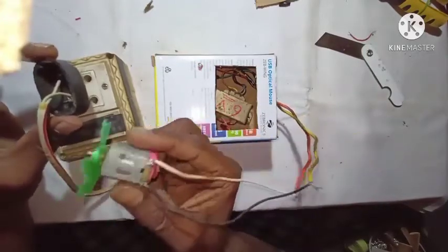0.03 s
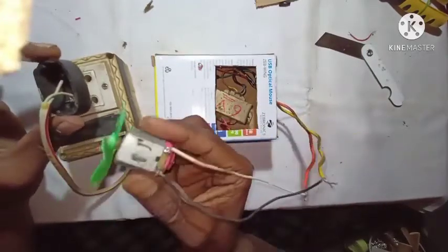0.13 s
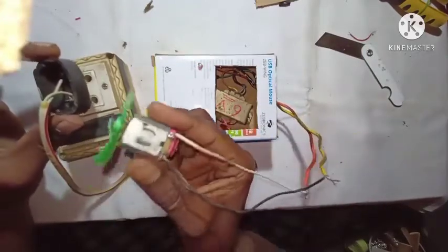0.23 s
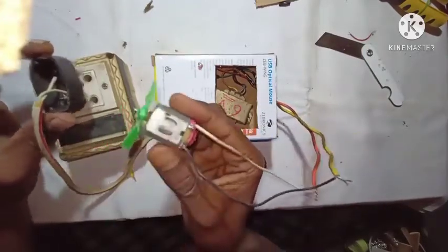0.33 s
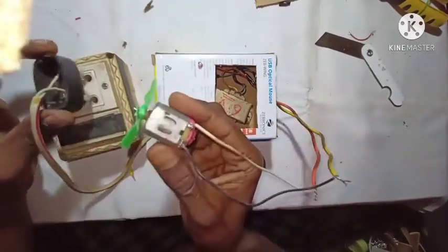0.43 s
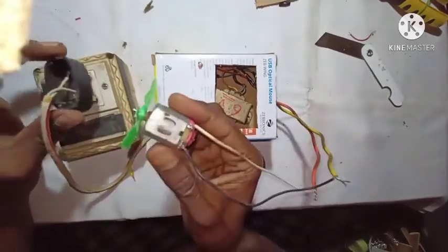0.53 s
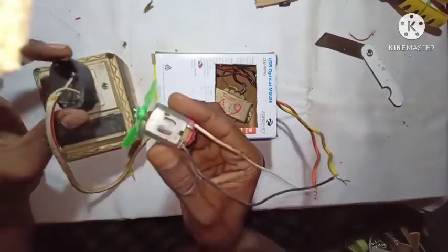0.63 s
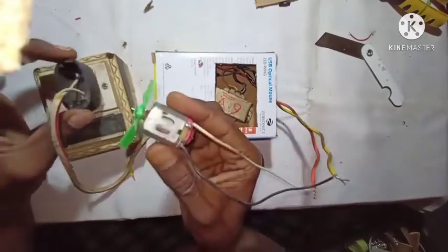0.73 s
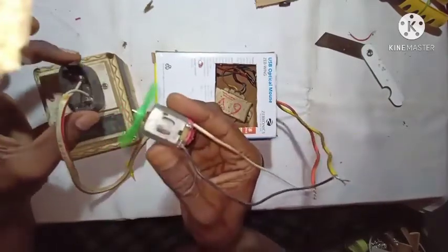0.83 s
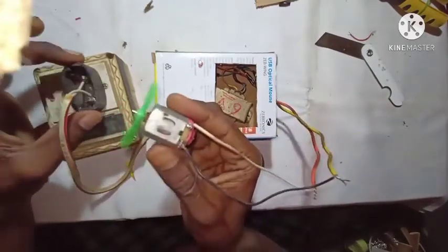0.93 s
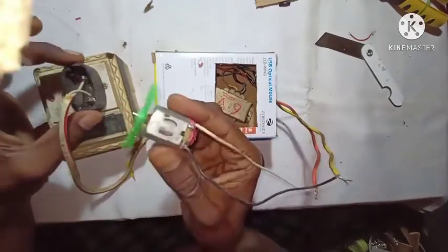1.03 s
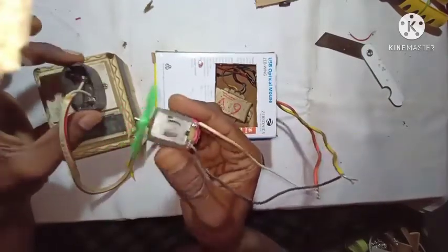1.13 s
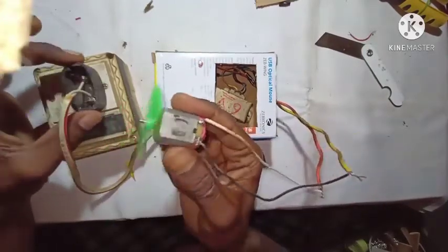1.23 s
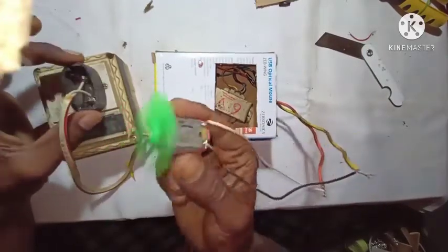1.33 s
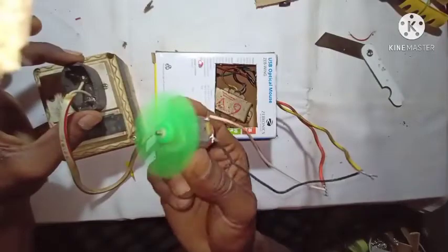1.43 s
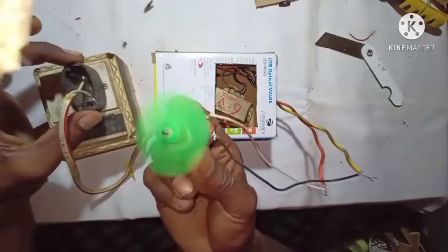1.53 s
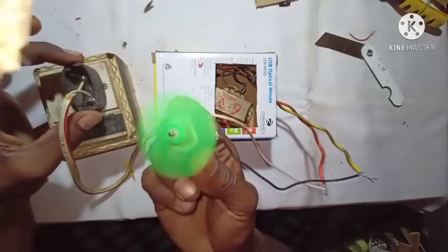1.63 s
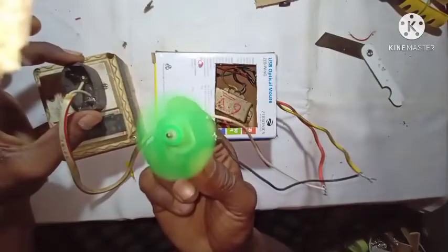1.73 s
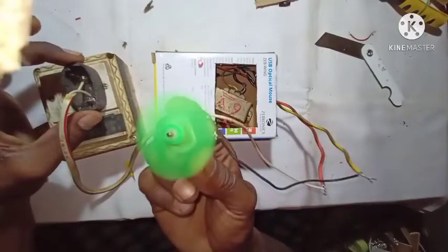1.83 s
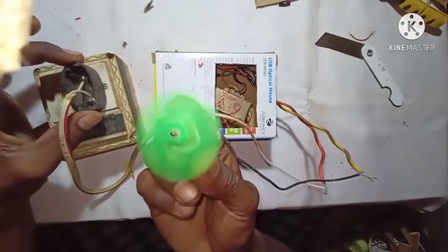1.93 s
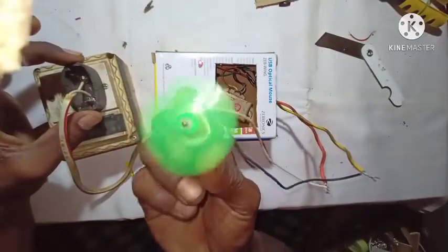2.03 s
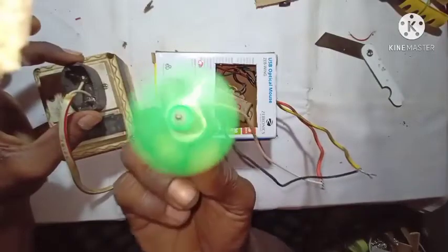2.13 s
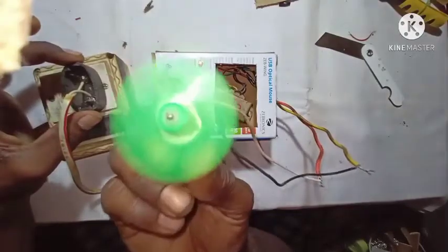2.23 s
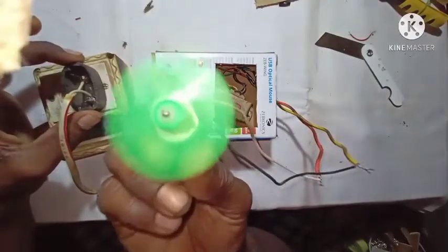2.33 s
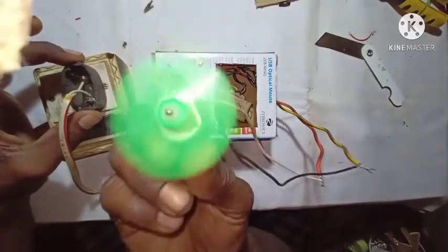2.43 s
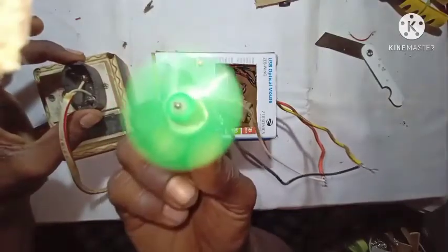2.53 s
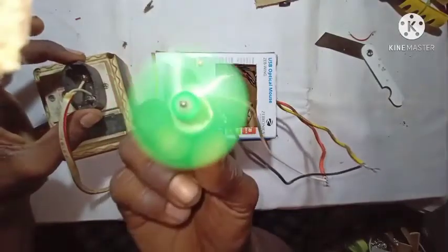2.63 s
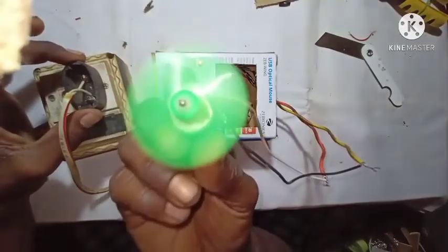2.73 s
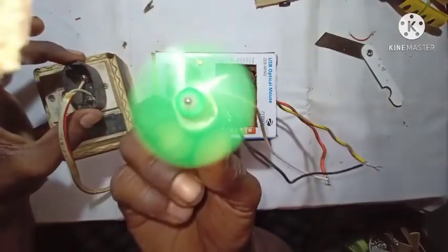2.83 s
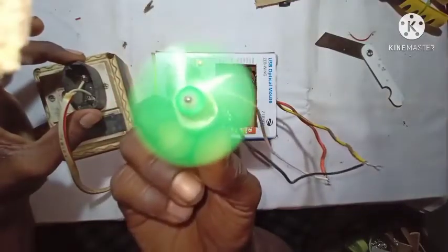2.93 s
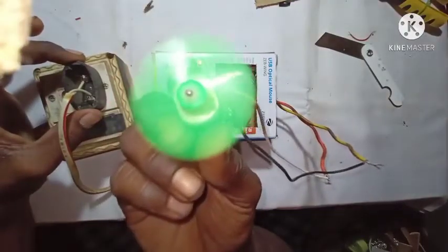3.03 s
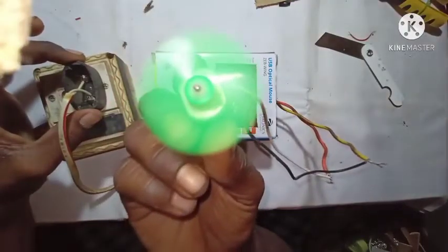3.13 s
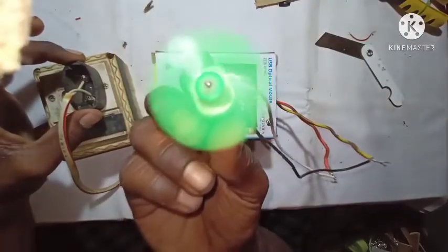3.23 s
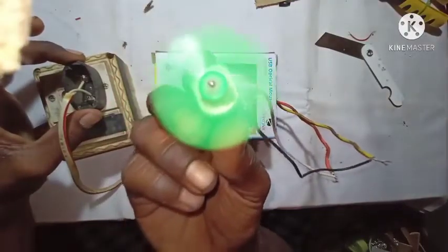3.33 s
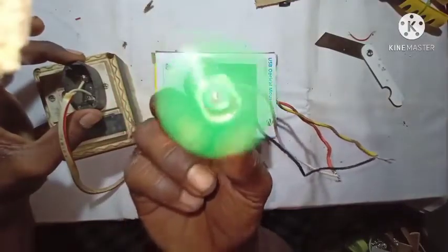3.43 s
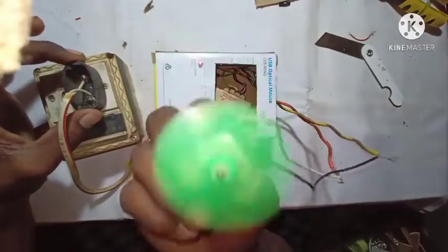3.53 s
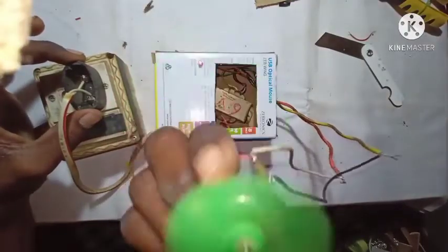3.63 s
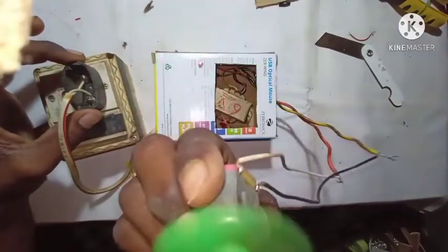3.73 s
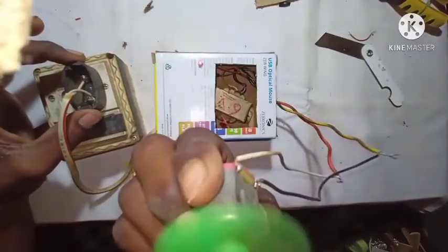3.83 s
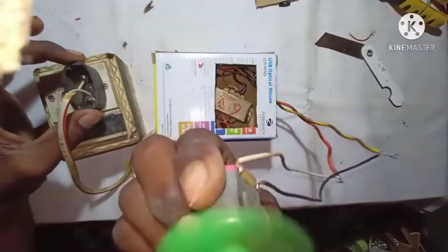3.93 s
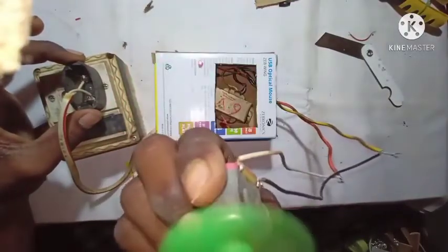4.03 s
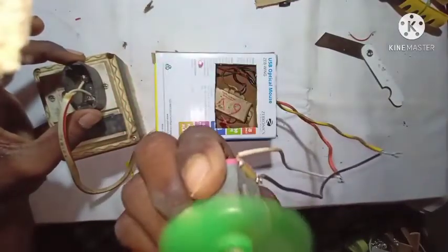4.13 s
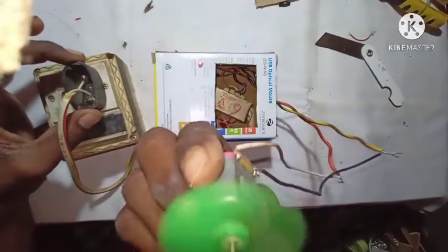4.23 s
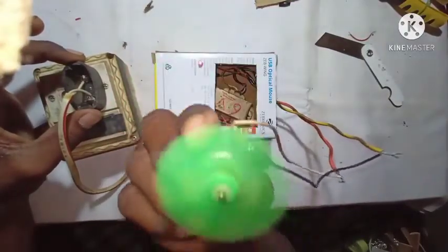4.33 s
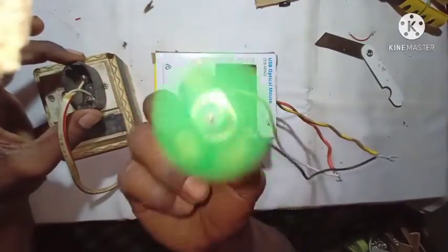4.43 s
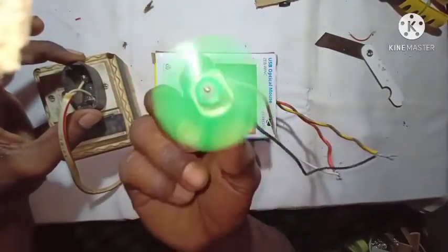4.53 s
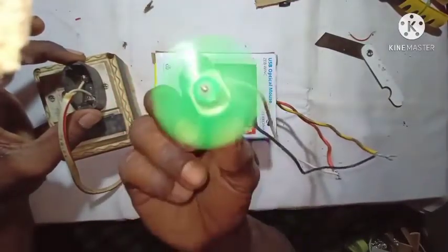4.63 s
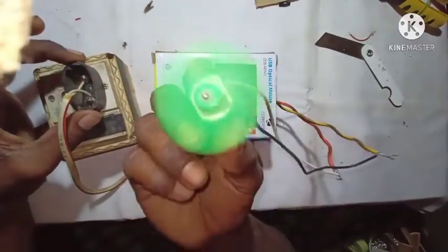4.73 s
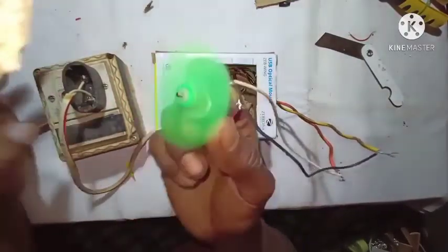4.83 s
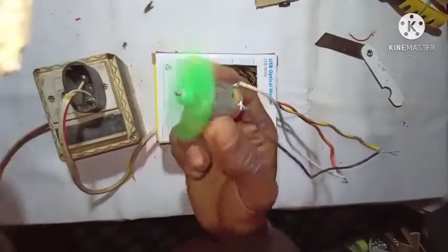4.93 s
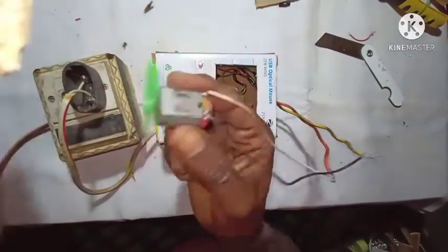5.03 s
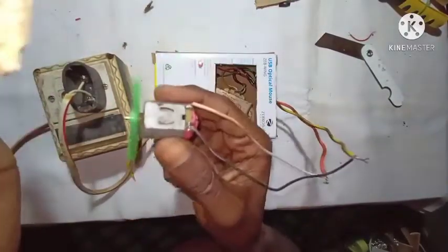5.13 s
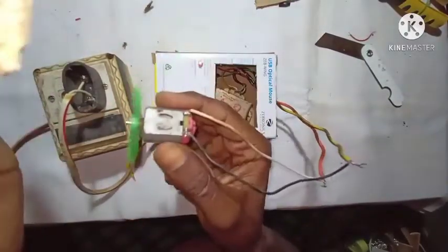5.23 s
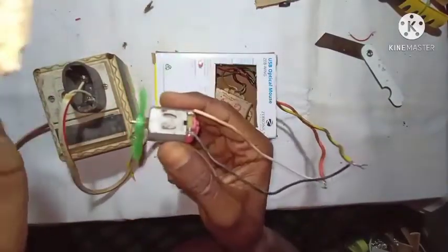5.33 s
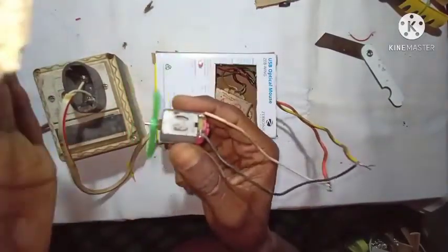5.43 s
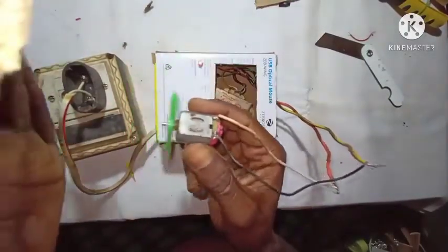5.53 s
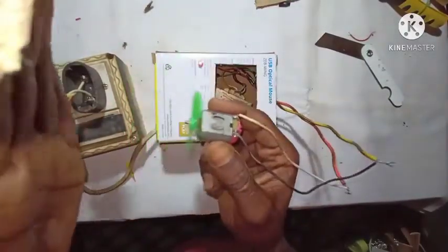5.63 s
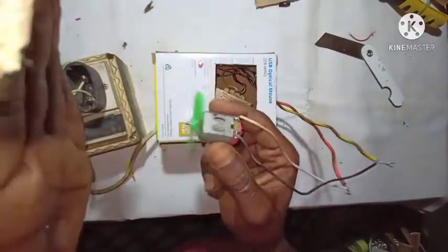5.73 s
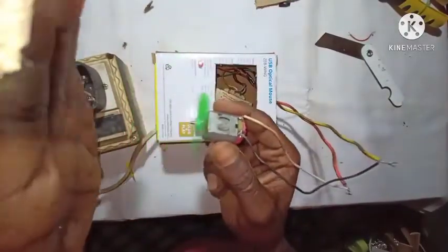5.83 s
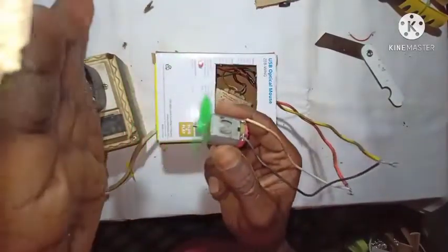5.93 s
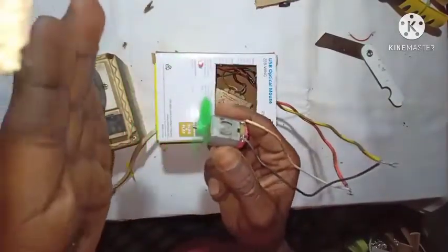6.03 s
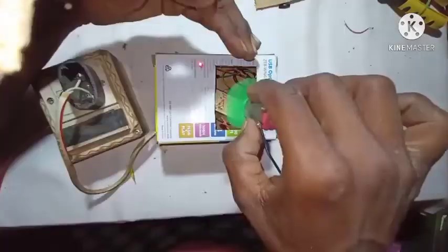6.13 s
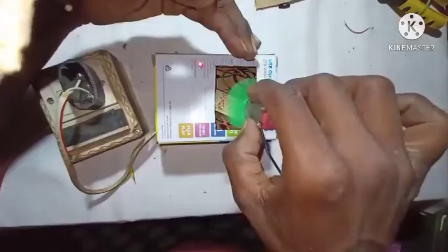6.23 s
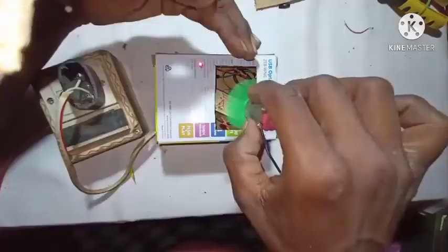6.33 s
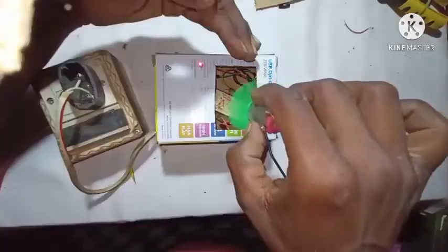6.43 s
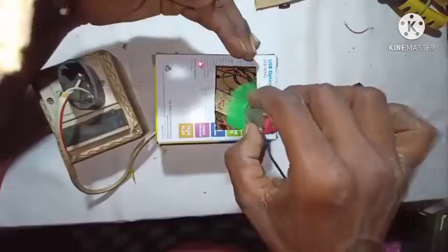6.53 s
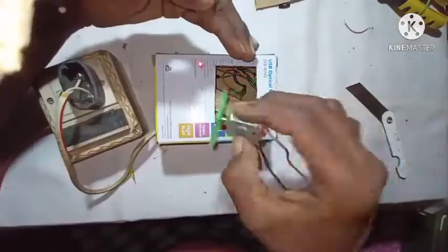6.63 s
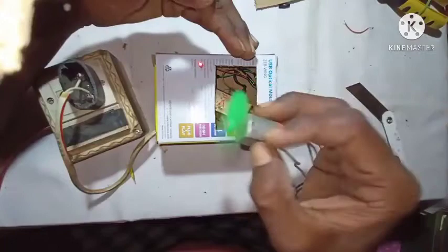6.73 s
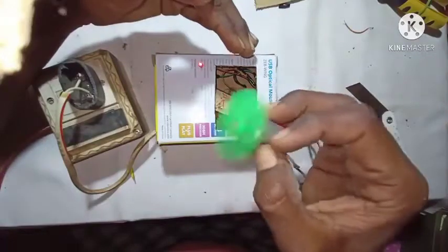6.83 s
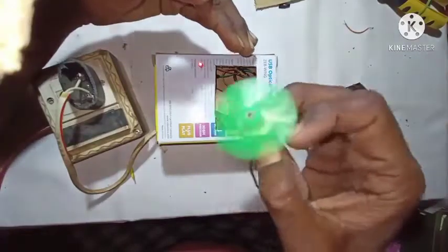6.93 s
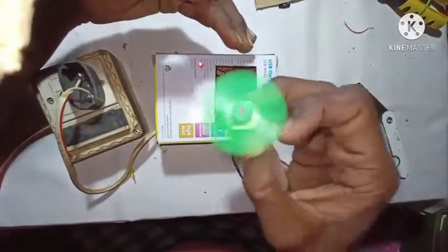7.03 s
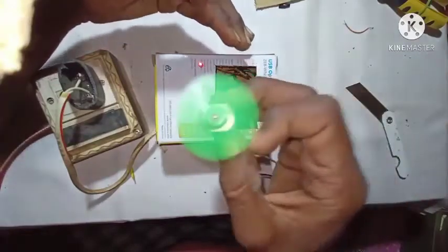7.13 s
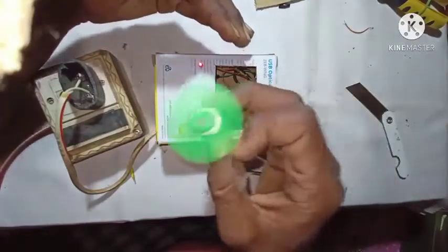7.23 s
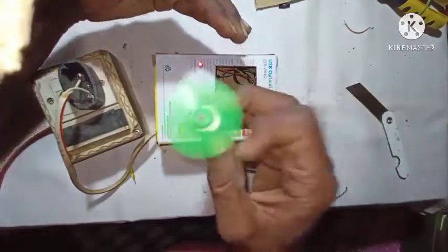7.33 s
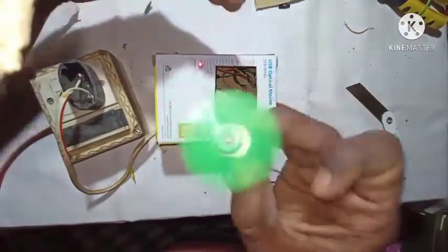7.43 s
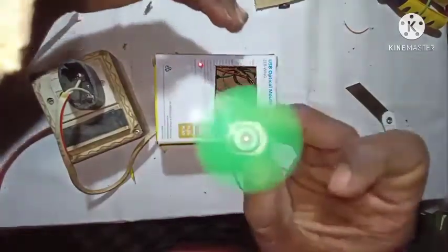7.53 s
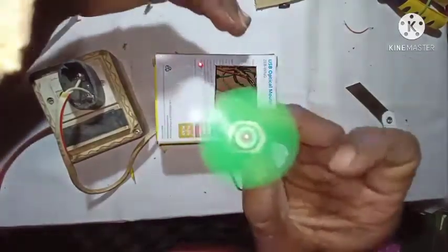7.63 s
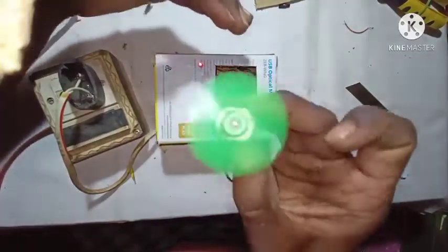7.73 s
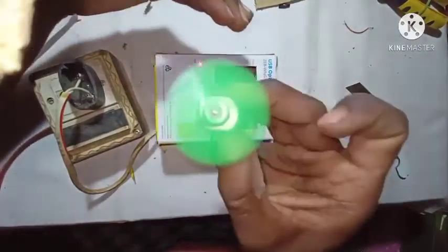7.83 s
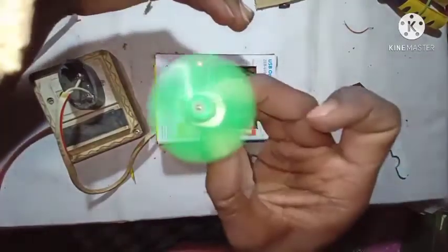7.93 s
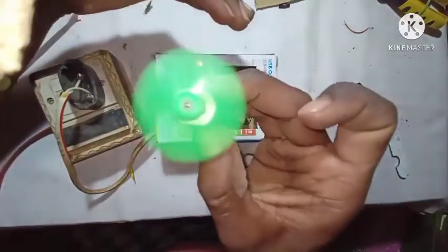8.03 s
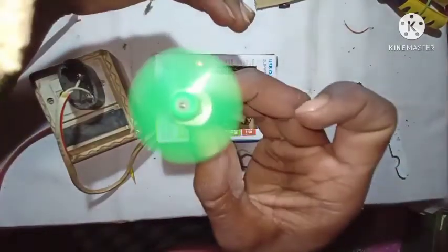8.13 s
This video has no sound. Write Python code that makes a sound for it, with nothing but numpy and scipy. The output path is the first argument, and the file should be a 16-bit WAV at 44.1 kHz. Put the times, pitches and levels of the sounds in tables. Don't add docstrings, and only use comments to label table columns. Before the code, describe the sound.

A hushed room, one faint rustle, then hard clicks and a short scrape of a plug in a plastic switch box. A small brushed motor with a fan spins up in under half a second, with hissing brushes and a fluttering, beating whine. Turning it shifts its tone and thumps the close microphone. After a brief dip it runs faster and louder; fingers buzz on it and momentarily brake the fan.

```python
import sys
import numpy as np
from scipy import signal
from scipy.fft import rfft, irfft, next_fast_len
from scipy.io import wavfile
from scipy.ndimage import uniform_filter1d, map_coordinates

SR = 44100
rng = np.random.default_rng(int(sys.argv[2]) if len(sys.argv) > 2 else 0)


def to_linear_factor(level_db):
    exponent = np.asarray(level_db, float) / 20
    return 10 ** exponent


def waveform_to_disk(signal):
    frames = np.transpose(np.atleast_2d(signal))
    scaled = np.clip(frames, -1, 1) * 32767
    samples = np.round(scaled).astype(np.int16)
    wavfile.write(sys.argv[1], SR, samples)


N = 361619


def seconds():
    return np.arange(N) / SR


def white():
    return rng.standard_normal(N)


def unit(x):
    return x / np.sqrt(np.mean(x ** 2) + 1e-20)


def curves(rows):
    s, *columns = np.transpose(rows)
    return [np.interp(seconds(), s, column) for column in columns]


def wobble(rate):
    knots = rng.standard_normal(int(N * rate / SR) + 4)
    return map_coordinates(knots, [np.arange(N) * rate / SR])


def bump(s, wide_s):
    return np.exp(-((seconds() - s) / wide_s) ** 2)


def held(rows, fall_s):
    t, gain = seconds(), 0
    for s, hold_s, db, rise_s in rows:
        rise_db = 20 * np.maximum((s - t) / rise_s, 0)
        fall_db = 20 * np.maximum((t - s - hold_s) / fall_s, 0)
        gain = gain + to_linear_factor(db - rise_db - fall_db)
    return gain


def filtered(x, response):
    m = next_fast_len(N + 8192)
    return irfft(rfft(x, m) * response(np.fft.rfftfreq(m, 1 / SR)), m)[:N]


def coloured(points, x):
    f, db = np.transpose(points)
    return unit(filtered(x, lambda hz: to_linear_factor(np.interp(np.log(hz + 1), np.log(f + 1), db))))


def resonant(modes, x):
    def response(f):
        total = 0
        for k, (centre, width, db) in enumerate(modes):
            peak = 1j * f * width / (centre * centre - f * f + 1j * f * width)
            total = total + (-1) ** k * to_linear_factor(db) * peak
        return total
    return filtered(x, response)


def patchy(x, depth_db):
    z = signal.stft(x, nperseg=512)[2]
    field = uniform_filter1d(rng.standard_normal(z.shape), size=2, axis=0)
    field = unit(uniform_filter1d(field, size=50, axis=1))
    return unit(signal.istft(z * to_linear_factor(depth_db * field), nperseg=512)[1][:N])


def blend(position, versions):
    return sum(np.clip(1 - abs(position - k), 0, 1) * v for k, v in enumerate(versions))


def puffs(rows):
    reach = SR // 30
    out, t = np.zeros(N), np.arange(-reach, reach) / SR
    for s, db, hz, half in rows:
        push = to_linear_factor(db) * np.exp(-(t / half) ** 2) * np.sin(2 * np.pi * hz * t + 0.53)
        out[round(s * SR) - reach:][:len(t)] -= push
    return out


# (frequency [Hz], level per Hz [dB])
ROOM_TONE = [(15, -28), (25, 10), (33, -26), (82, -15), (204, 5), (246, -2), (399, -3.5), (1240, -14),
             (1620, -14), (2850, -22), (15500, -23)]


def room():
    return to_linear_factor(-83) * coloured(ROOM_TONE, white())


# (time [s], level [dB])
RUSTLE = [
    (.235, -130),
    (.25, -98),
    (.3, -86),
    (.32, -130),
]


def rustle():
    band = [(7600, 1800, 0)]
    return to_linear_factor(curves(RUSTLE)[0]) * unit(resonant(band, resonant(band, white())))


# (time [s], peak level [dB], fizz [dB], 60 dB decay [s], brightness [dB])
CLICKS = [
    (0.649, -73, -2, 0.02, 0),
    (0.657, -31.5, -13, 0.05, 8),
    (0.669, -39, -4, 0.03, 0),
    (0.907, -34, -10, 0.03, 8),
    (0.928, -47, 0, 0.02, 2),
    (0.95, -44, -16, 0.05, -5),
    (0.969, -42, -10, 0.05, 0),
    (1.017, -42, -10, 0.05, 0),
    (1.032, -29, -11, 0.05, 3),
]
# (centre [Hz], width [Hz], level [dB])
BOX = [(170, 30, 8), (420, 420, -4), (1245, 150, 5.5), (2330, 250, -7), (3050, 160, -3.5), (4080, 400, -13)]
# (time [s], hold [s], level [dB], rise per 20 dB [s])
SCRAPE = [
    (.66, .03, -63, .002),
    (.73, .15, -93, .03),
    (.808, .006, -79, .025),
    (.886, .018, -82, .01),
    (.912, .14, -65, .02),
]


def switch():
    t = np.arange(SR // 8) / SR
    knock, fizz = np.zeros((3, N + SR)), np.zeros(N + SR)
    tilt = np.array([[-.8], [0], [1]])
    for s, db, fizz_db, t60, bright_db in CLICKS:
        start = round(s * SR)
        burst = rng.standard_normal((2, len(t)))
        decay = .3 * to_linear_factor(-60 * t / 0.0026) + 0.12 * to_linear_factor(-60 * t / t60)
        blow = 2.6 * (t == 0) + decay * burst[0]
        knock[:, start:][:, :len(t)] += to_linear_factor(db + 6.5 + bright_db * tilt) * blow
        fizz[start:][:len(t)] += to_linear_factor(db + fizz_db - 1.5 - 60 * t / 0.017) * burst[1]
    grit = held(SCRAPE, fall_s=.022) * to_linear_factor(2.2 * wobble(300)) * white()
    low, middle, high = [x[:N] + 3.9 * grit for x in knock]
    box = resonant(BOX[:2], low) + resonant(BOX[2:3], middle) - resonant(BOX[3:], high)
    return box + resonant([(7800, 4000, 0), (14300, 2500, -2)], fizz[:N] + .6 * grit)


# (centre [s], peak level [dB], frequency [Hz], half length [s])
CHATTER = [(.659, -50, 3050, .0012), (.659, -50, 2300, .0012), (.66, -47, 1250, .002),
           (.916, -58, 9100, .003), (.922, -50, 9300, .0025), (.953, -53, 1200, .004),
           (.965, -52, 400, .003), (.971, -44, 1250, .0028), (.981, -52, 330, .003),
           (.999, -51, 1350, .002), (.999, -50, 450, .002), (1.008, -48, 380, .003),
           (1.009, -52, 1200, .003), (1.016, -46, 420, .002), (1.018, -48, 1300, .002),
           (1.026, -50, 1250, .0025), (1.0326, -30.5, 1200, .0009), (1.036, -47, 1250, .003),
           (1.06, -58, 700, .004), (1.09, -57, 600, .005), (1.125, -56, 750, .004), (1.16, -56, 620, .005),
           (5.17, -53, 480, .005), (5.205, -50, 540, .005), (5.24, -53, 500, .005),
           (7.406, -46, 2400, .0015)]


def chatter():
    return puffs(CHATTER)


START_S, SPIN_UP_S = 1.05, .38


def slowness():
    return np.clip(1 - (seconds() - START_S) / SPIN_UP_S, 0, 1) ** 1.6


# (time [s], turn rate [Hz], unbalance tone level [dB])
SHAFT = [(1.5, 381.5, -56), (2.19, 358.5, -52.5), (2.31, 338.6, -51.5), (3.55, 320.1, -51.5),
         (3.75, 340.6, -48), (4.19, 354.2, -45.5), (4.85, 349.1, -52), (5.08, 373.5, -57.5),
         (5.3, 398.5, -51.5), (6.18, 404, -50.5), (6.19, 442, -38), (6.65, 443.7, -38), (6.92, 380, -44),
         (7.19, 369, -48.5), (7.29, 384, -49), (7.39, 377.5, -50), (7.66, 400.5, -43.5), (8.2, 365, -45)]


def speed():
    brake_s, grip_s, recover_s, brake_hz = 7.385, .031, .09, 49
    t = seconds()
    recovery = np.exp(-np.maximum(t - brake_s - grip_s, 0) / recover_s)
    brake = np.clip((t - brake_s) / grip_s, 0, 1) * recovery
    return curves(SHAFT)[0] - 195 * slowness() - brake_hz * brake


# (time [s], lead over the shaft [Hz])
WHIRL_LEAD = [
    (1.05, 185),
    (1.2, 147),
    (1.3, 74),
    (1.4, 35),
    (1.55, 12),
    (4.86, 17),
    (5.05, 57),
    (5.28, 60),
    (5.52, 40),
    (6.17, 53),
]
# (time [s], beats so far [count])
MEETINGS = [(1.585, 0), (2.025, 6), (2.268, 8), (2.418, 9), (2.51, 10), (2.65, 11), (2.772, 12),
            (3.215, 16), (3.347, 17), (3.48, 18), (3.597, 19), (3.669, 20), (3.82, 24), (3.873, 25),
            (3.94, 26), (4.007, 27), (4.358, 33), (4.443, 34), (4.59, 36), (4.657, 37), (4.78, 39),
            (4.87, 40)]


def rotation():
    shaft_hz = speed() + 0.78 * wobble(25)
    free = np.cumsum(curves(WHIRL_LEAD)[0]) / SR
    s, beats = np.transpose(MEETINGS)
    correction = np.interp(seconds(), s, beats - np.interp(s, seconds(), free))
    lead = free + uniform_filter1d(correction, size=3000)
    return 2 * np.pi * np.cumsum(shaft_hz) / SR, 2 * np.pi * lead


def change_db():
    change_s, fade_out_s, fade_in_s = 6.195, .06, .11
    return np.interp(seconds(), [change_s - fade_out_s, change_s, change_s + fade_in_s], [0, -7, 0])


def grown_db(power):
    return power * 20 * np.log10(speed() / 380) + change_db()


# (time [s], direction [-1 to 7])
POSE = [(1.1, -1), (1.27, 0), (2.1, 0), (2.3, 1), (3.6, 1), (3.75, 2), (4.4, 2), (4.5, 3), (4.95, 3),
        (5.3, 4), (6.17, 4), (6.2, 5), (6.68, 5), (6.76, 6), (7.43, 6), (7.48, 7)]


def heard(rows):
    position = curves(POSE)[0] + 1
    return [np.interp(position, np.arange(len(rows)), column) for column in np.transpose(rows)]


FLARE_S, FLARE_WIDE_S = 5.04, .15
# (order 2 [dB], order 3 [dB], sum tones [dB], throb [0-1])
WHIRL_HEARD = [(-70, -66, -75, .2), (-59.5, -60.5, -61, .15), (-69, -56, -63, .52), (-67, -67, -58, .25),
               (-66, -68, -59, .2), (-73, -73, -69, .02), (-110, -110, -110, .1), (-110, -110, -110, .1),
               (-110, -110, -110, .1)]
# (brush rub [dB], blade rush [dB], draught [dB])
NOISE_HEARD = [(-39.5, -54, -62), (-41.5, -51, -64.5), (-43, -53.5, -64), (-44, -55.5, -64),
               (-43, -53, -61.5), (-43, -51.5, -61.5), (-42, -53, -68), (-40.5, -53.5, -66.5),
               (-41.5, -54.5, -66)]
# (time [s], rub [dB], shaft orders 2, 3, 4, 5, 6 [dB])
TOUCH = [(7.22, 0, 0, 0, 0, 0, 0), (7.27, 0, -4, 0, 7, 0, 3), (7.38, 0, -6, 1, 7, 0, 3),
         (7.392, 4, -6, 3, 8, 5, 4), (7.404, 7, -8, 4, 6, -2, 3), (7.413, 3.5, -10, 4, 0, 1, -6),
         (7.42, 0, -11, -12, -5, 1, -9), (7.46, -2.5, -8, -5, 18, -6, -12), (7.48, -1, -2, -14, 0, -10, -9),
         (7.5, -1, -3, -16, 3, -8, -6), (7.51, 0, -2, 1, 9, -2, -3), (7.58, 0, 0, 0, 0, 0, 0)]
# (frequency [Hz], level per Hz [dB])
STARTING = [(1700, -30), (2400, -10.5), (3600, -3), (4450, -12), (5600, -5), (6500, -12), (8000, -14),
            (8600, -11), (9900, -15), (10700, -8), (11500, -16), (12400, -9), (13100, -13), (15420, 0)]
# (frequency [Hz], level per Hz [dB])
SIDE_ON = [(1900, -35), (2670, -9.5), (3450, -1.5), (4050, -4.6), (4820, -11.9), (5680, -4.3),
           (6200, -11.5), (7580, -5.7), (8350, -10.6), (10590, -4.6), (11540, -12.2), (12320, 1.2),
           (12920, -7.6), (15420, -2.5)]
# (frequency [Hz], level per Hz [dB])
FACE_ON = [(1900, -35), (2670, -8.2), (3270, -3.0), (4220, -5.3), (4570, -12.5), (5600, -1.3), (6290, -8.6),
           (7060, -8.1), (7410, -5.3), (8870, -11.9), (9220, -8.1), (9820, -9.4), (14130, -3.9),
           (15420, -1.1)]
# (frequency [Hz], level per Hz [dB])
TIPPED = [(1900, -35), (2670, -9.0), (3360, -2.3), (7150, -6.0), (7580, -1.5), (8610, -8.2), (10080, -5.8),
          (10250, -9.1), (11110, -0.9), (11890, -4.4), (12580, 0.6), (13260, -6.1), (14810, -1.4),
          (15420, -2.3)]
# (frequency [Hz], level per Hz [dB])
LIFTED = [(1900, -35), (2670, -8.2), (3360, 0.6), (4740, -6.0), (5170, -5.4), (5600, 0.6), (6370, -10.2),
          (7750, -1.6), (8790, -9.6), (9650, -6.1), (11280, -7.2), (12140, -0.1), (12580, -4.4),
          (15420, -1.2)]
# (frequency [Hz], level per Hz [dB])
AWAY = [(1900, -35), (2670, -9.2), (2900, -11), (3200, 0), (3750, 2), (4250, -6), (4910, -12), (5600, -2),
        (6550, -6.5), (8200, -8), (11700, -7), (12300, -4), (12900, -8), (15420, -2.5)]
# (frequency [Hz], level per Hz [dB])
CUPPED = [(1900, -35), (2670, -7.1), (4130, -5.4), (4820, -13.1), (5940, -2.3), (6290, -8.2), (6890, -4.5),
          (8790, -7.2), (10510, -2.9), (11460, -8.9), (12140, -2.7), (12490, -2.5), (12750, -5.2),
          (15420, 0.3)]
# (frequency [Hz], level per Hz [dB])
PINCHED = [(1900, -35), (2670, -14.7), (3270, -7.5), (4310, -4.5), (4910, -14.3), (5430, -8.0),
           (7920, -7.4), (8960, -13.6), (9470, -6.5), (11540, -8.2), (12230, -0.1), (12920, -7.8),
           (14380, -4.8), (15420, -0.2)]
# (frequency [Hz], level per Hz [dB])
RAISED = [(1900, -35), (2670, -13.6), (3190, -5.2), (4220, -3.5), (4740, -7.7), (7840, -4.9), (8270, -7.8),
          (9130, -8.0), (9650, -1.8), (10340, -7.0), (12580, -1), (12750, -4.5), (14640, -3.8),
          (15420, 0.1)]
# (centre [Hz], width [Hz], level [dB])
END_CAP = [(5550, 750, 7), (3200, 670, -0.5)]
# (time [s], hold [s], level [dB], rise per 20 dB [s])
RATTLE = [
    (6.4, .28, -66, .12),
    (6.75, .17, -54, .12),
    (7.4, .005, -68, .02),
    (7.58, .1, -64, .1),
]


def rub(shaft, lead):
    throb = heard(WHIRL_HEARD)[-1]
    gate = 1 + .12 * np.cos(shaft)
    gate = gate * (1 + .35 * throb * np.cos(shaft + lead)) * (1 + .2 * throb * np.cos(lead))
    noise = patchy(gate * to_linear_factor(0.64 * wobble(900)) * white(), depth_db=2.1)
    views = [STARTING, SIDE_ON, FACE_ON, TIPPED, LIFTED, AWAY, CUPPED, PINCHED, RAISED]
    can = blend(curves(POSE)[0] + 1, [coloured(view, noise) for view in views])
    press = throb * (((1 + np.cos(lead)) / 2) ** 3 - .17)
    cap = press * sum(resonant([mode], can) for mode in END_CAP)
    fingers = unit(resonant([(1030, 106, 14.5), (740, 150, 1.5)], noise))
    buzz = held(RATTLE, fall_s=.15) * to_linear_factor(1.8 * wobble(60)) * fingers
    rub_db = heard(NOISE_HEARD)[0] + grown_db(1.5) + curves(TOUCH)[0] + 1.82
    crackle_db = slowness() * (-1.5 + 3.5 * wobble(250))
    flare_db = 1.5 * bump(FLARE_S + .1, FLARE_WIDE_S)
    return to_linear_factor(rub_db + crackle_db + flare_db) * (can + cap) + buzz


# (centre [Hz], width [Hz], held in front [dB], held aside [dB], after the scene changes [dB])
BLADES = [(520, 790, -5.5, -9.5, -8), (1036, 254, 0.5, -3.5, -2), (1570, 436, 0, -6.5, -4.5),
          (2072, 455, 2, 0, 0.5), (2315, 450, 0.5, 0.5, -1.5)]
# (time [s], blade view [0-2])
GRIP = [
    (4.85, 0),
    (5.1, 1),
    (6.17, 1),
    (6.2, 2),
]
# (frequency [Hz], level per Hz [dB])
DRAUGHT = [(15, -54), (25, -16), (48, -26), (86, -18), (129, -2.5), (259, -4.5), (290, -4.5), (380, -1.5),
           (640, -120)]


def air():
    _, rush_db, draught_db = heard(NOISE_HEARD) + grown_db(.6)
    noise = patchy(white(), depth_db=1.5)
    views = []
    for k in range(3):
        modes = [(hz, width, db[k]) for hz, width, *db in BLADES]
        views.append(unit(resonant(modes, noise)))
    rush = to_linear_factor(rush_db - 1.5 + .8 * wobble(12)) * blend(curves(GRIP)[0], views)
    lumps = to_linear_factor(2.1 * wobble(30)) * white()
    draught = to_linear_factor(draught_db + 1.5) * coloured(DRAUGHT + [(600, -27), (3000, -60)], lumps)
    return rush + draught


# (centre [s], peak level [dB], frequency [Hz], half length [s])
THUMPS = [(.958, -51, 220, 0.0051), (1.019, -47, 185, 0.014), (1.035, -42.5, 177, 0.0093),
          (1.383, -36.5, 210, 0.0027), (1.447, -37.5, 200, 0.0033), (1.467, -45, 170, 0.008),
          (1.505, -42.5, 200, .006), (5.16, -41, 160, 0.0071), (5.178, -43.5, 215.5, .008),
          (5.203, -38, 221, 0.0044), (5.224, -38, 154, 0.0056), (5.242, -43, 241.4, 0.0035),
          (6.945, -48, 160, .006), (6.96, -50, 120, 0.0074), (6.99, -47, 140.2, .006),
          (7.005, -43.5, 162.3, 0.0082)]


def thumps():
    return puffs(THUMPS)


def tone(angle, db, flutter_db=0.28):
    return np.sqrt(2) * to_linear_factor(db + flutter_db * wobble(30)) * np.sin(angle)


# (shaft order, whirl order, level [dB])
SUM_TONES = [(1, 1, -11), (2, 1, -6), (1, 2, -8), (0, 1, -8)]
SWELL_LAG = [0, .38, -.1, .29, 0, 0, 0]
# (orders 2, 3, 4, 5, 6 [dB])
UPPER_HEARD = [(-75, -80, -82, -82, -82), (-64, -71, -75, -62, -72), (-65, -67, -59, -88, -76),
               (-61, -65, -60, -60, -75), (-60, -62, -64, -64, -66), (-63, -66, -80, -64, -73),
               (-58.5, -60, -49.5, -45, -49), (-52.5, -52, -62, -52.5, -55), (-54.5, -52, -62, -63, -66)]
# (frequency [Hz], level [dB])
SHELL = [(730, -7), (810, 0), (1190, 0), (1228, -22), (1650, -1), (1850, -9), (1915, 0), (2050, -12)]


def whine(shaft, lead):
    start = rng.uniform(0, 2 * np.pi, len(SWELL_LAG))

    def angle(turns, whirls):
        order = turns + whirls
        return order * shaft + start[order] + whirls * (lead - 2 * np.pi * SWELL_LAG[order])

    swing_db = 4.5 * bump(1.41, .05)
    turn = tone(angle(1, 0), curves(SHAFT)[1] + swing_db, flutter_db=.6)

    shaft_hz, slow = speed(), slowness()
    slow_db = -27 * slow
    mute_db = -15 * bump(6.87, .13)
    touch_db, upper = curves(TOUCH)[1:], 0
    for k, db in enumerate(heard(UPPER_HEARD)):
        order = k + 2
        shell_db = np.interp(order * shaft_hz, *np.transpose(SHELL)) + slow_db + (order > 2) * mute_db
        upper = upper + tone(angle(order, 0), db + shell_db + touch_db[k], flutter_db=1.2)

    second_db, third_db, sums_db, _ = heard(WHIRL_HEARD)
    second_db, third_db, sums_db = second_db + slow_db, third_db + .3 * slow_db, sums_db + slow_db
    fourth_db = (second_db + third_db) / 2 - 2.5 - 40 * slow
    whirl_db = [second_db, third_db, fourth_db, third_db - 10]
    swell_db = 8 * bump(FLARE_S, FLARE_WIDE_S) + 4 * bump(1.48, .09)
    whirl = to_linear_factor(swell_db) * sum(tone(angle(0, k + 2), db) for k, db in enumerate(whirl_db))
    sums = sum(tone(angle(a, b), sums_db + db, flutter_db=1.6) for a, b, db in SUM_TONES)

    fade_in = np.clip((seconds() - START_S) / .07, 0, 1)
    return (turn + upper + whirl + sums) * to_linear_factor(1.5 * change_db()) * fade_in


def scene():
    shaft, lead = rotation()
    running = np.clip((seconds() - .9) / 0.1, 0, 1)
    mono = room() + rustle() + switch() + chatter()
    mono = mono + running * (rub(shaft, lead) + air()) + thumps() + whine(shaft, lead)
    return np.array([mono, mono])


def stray(mono):
    side, window = np.zeros(N), np.sin(np.pi * np.arange(2048) / 2048)
    hz = np.fft.rfftfreq(2048, 1 / SR)
    for when, where in rng.random((30, 2)):
        start, low = int((1.3 + 6.7 * when) * SR), 4200 + 9500 * where
        band = (hz > low) & (hz < low + 1700)
        size = np.abs(rfft(mono[start:][:2048] * window))[band].mean()
        phase = np.exp(2j * np.pi * rng.random(len(hz)))
        side[start:][:2048] += window * irfft(band * size * phase)
    return side


def low_pass(x):
    return signal.sosfilt(signal.butter(12, 16810, fs=SR, output="sos"), x)


def record(dry):
    def response(hz):
        return (1j * hz / (1j * hz + 30)) * np.clip((15600 - hz) / 120, 0, 1)
    mono = filtered(dry[0], response)
    mono = mono - .05 * uniform_filter1d(np.abs(mono), size=SR // 4)
    side = to_linear_factor(1.5) * stray(mono)
    return low_pass(np.array([mono + side, mono - side]))


dry = scene()
out = record(dry)
waveform_to_disk(out)
```